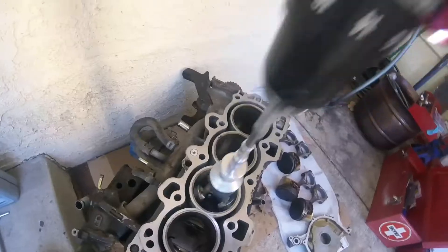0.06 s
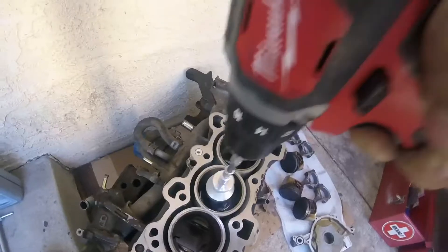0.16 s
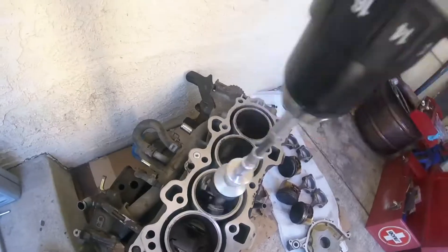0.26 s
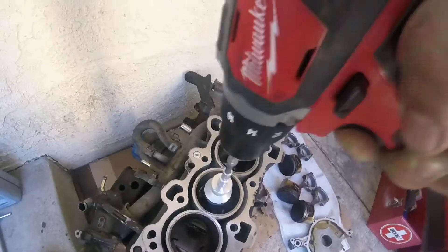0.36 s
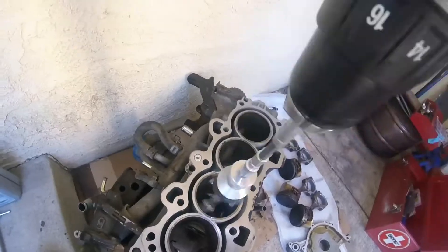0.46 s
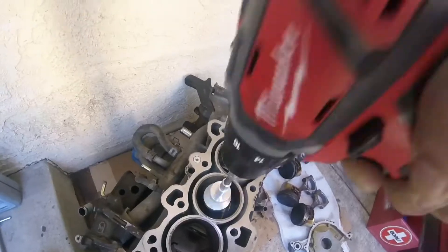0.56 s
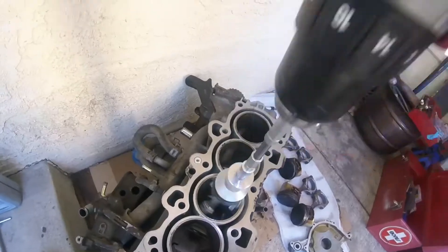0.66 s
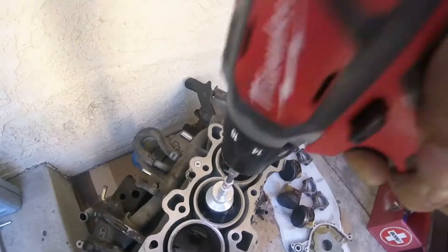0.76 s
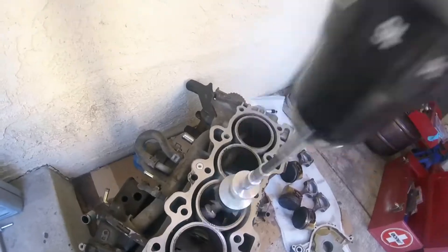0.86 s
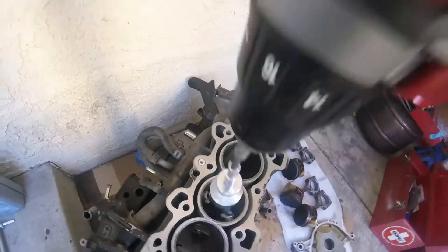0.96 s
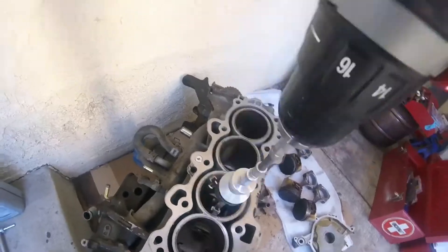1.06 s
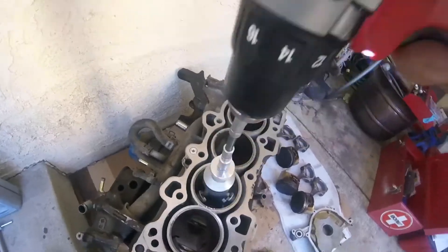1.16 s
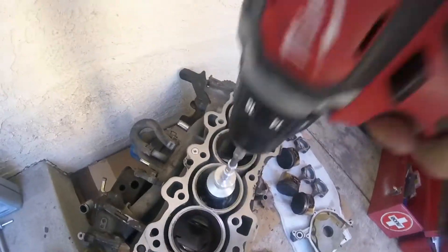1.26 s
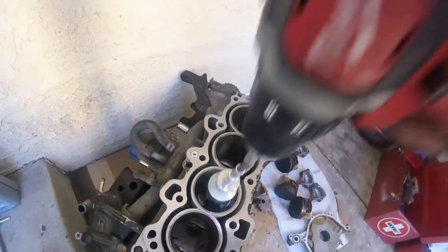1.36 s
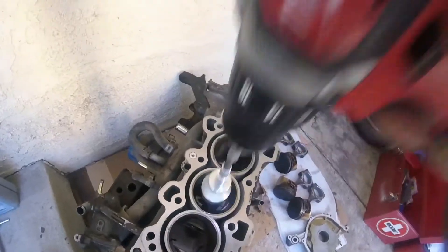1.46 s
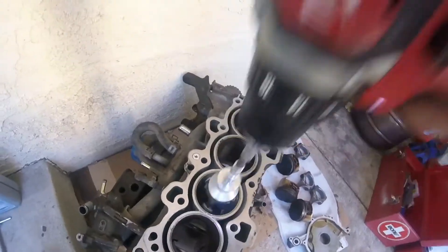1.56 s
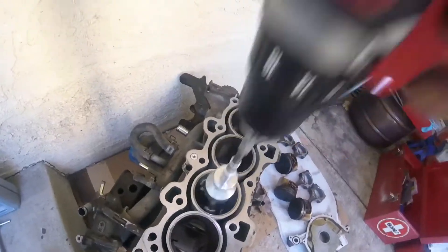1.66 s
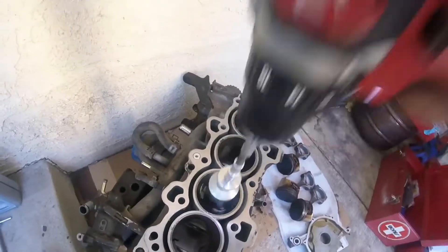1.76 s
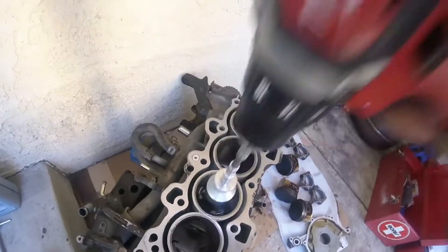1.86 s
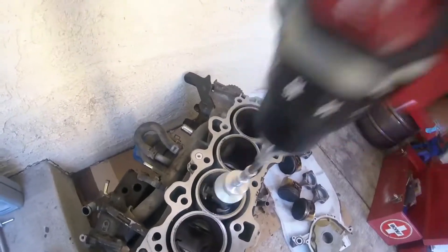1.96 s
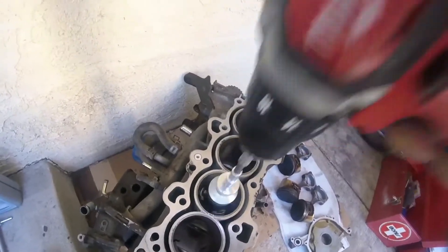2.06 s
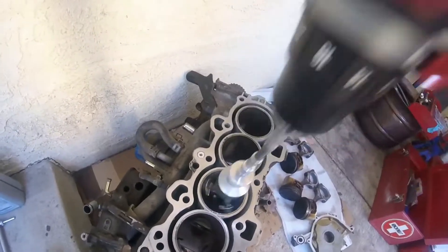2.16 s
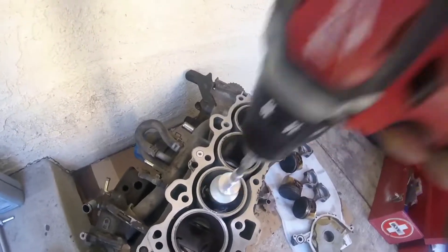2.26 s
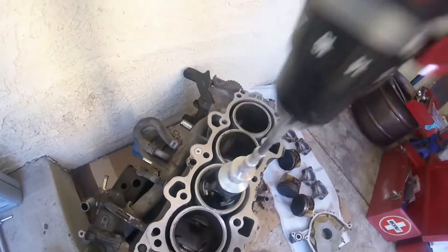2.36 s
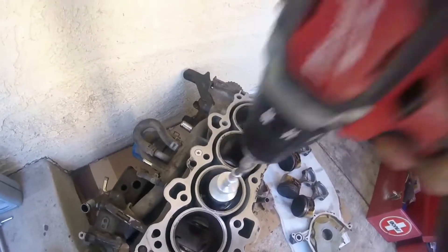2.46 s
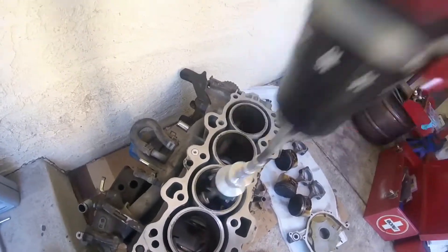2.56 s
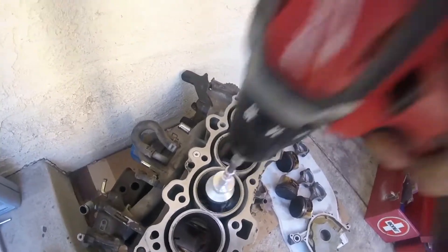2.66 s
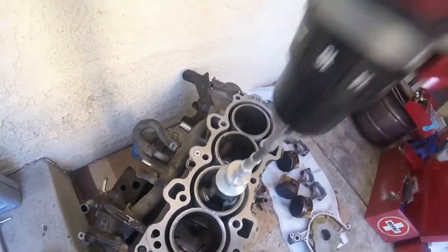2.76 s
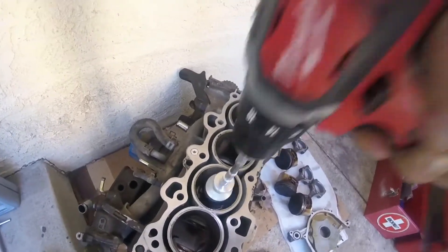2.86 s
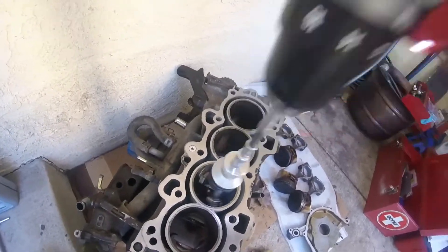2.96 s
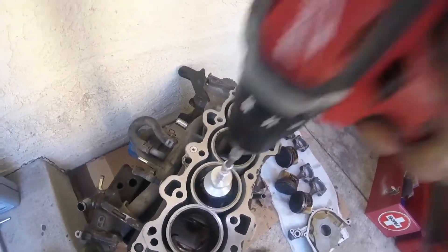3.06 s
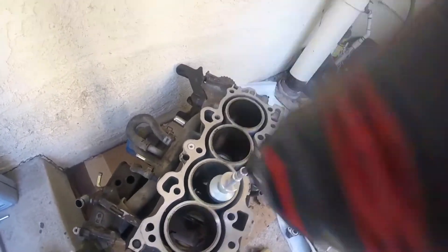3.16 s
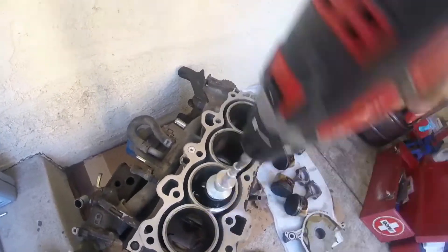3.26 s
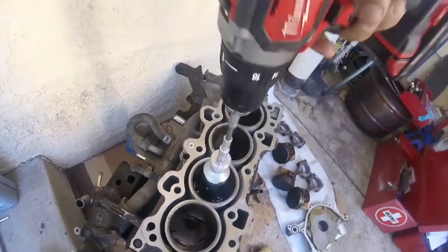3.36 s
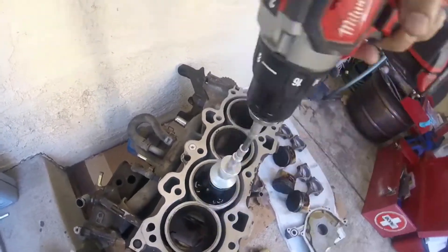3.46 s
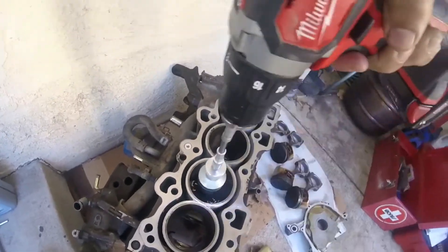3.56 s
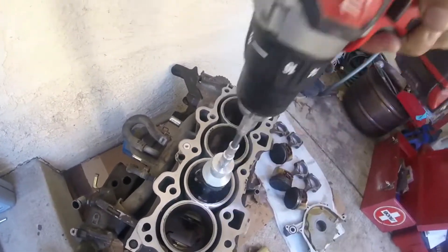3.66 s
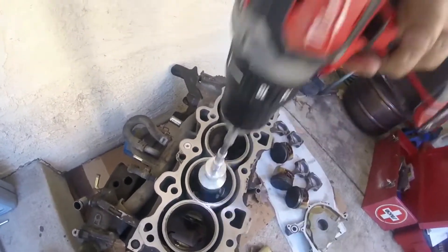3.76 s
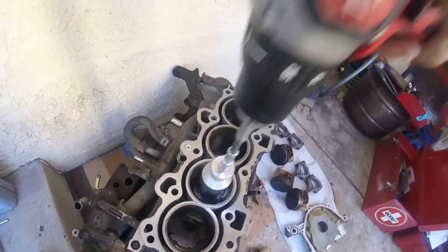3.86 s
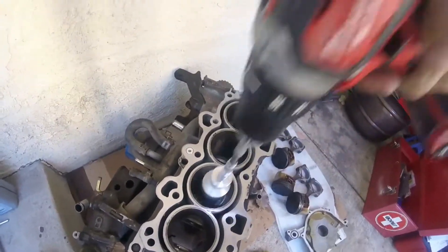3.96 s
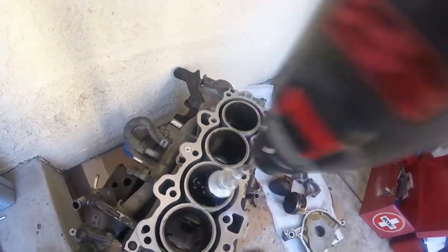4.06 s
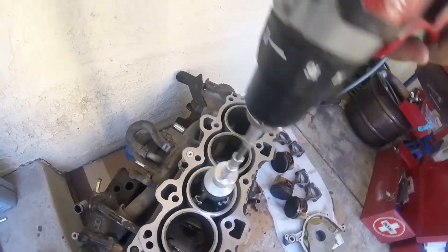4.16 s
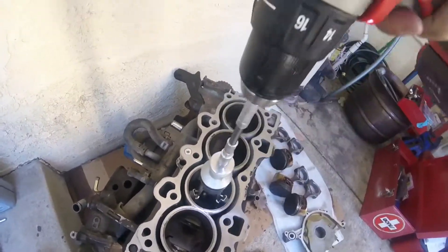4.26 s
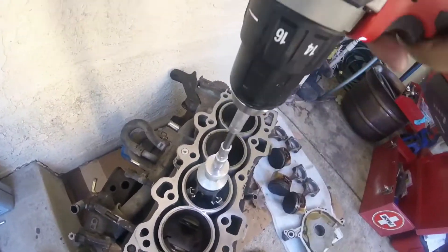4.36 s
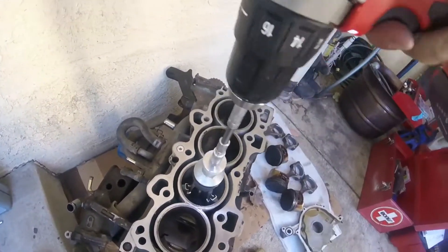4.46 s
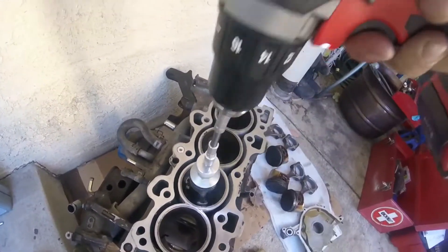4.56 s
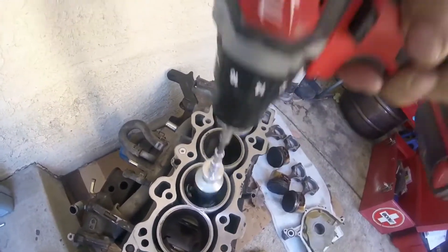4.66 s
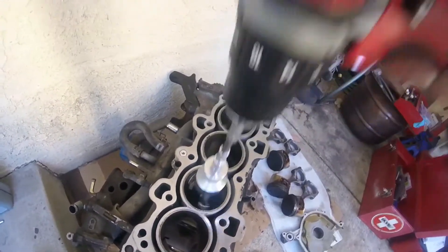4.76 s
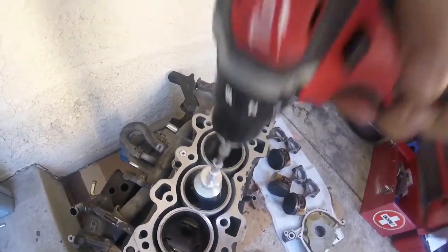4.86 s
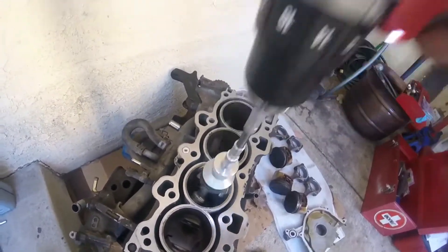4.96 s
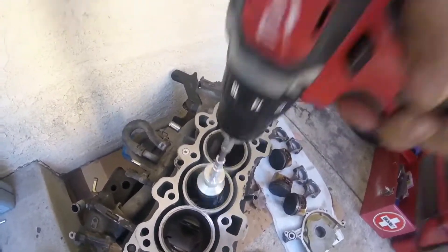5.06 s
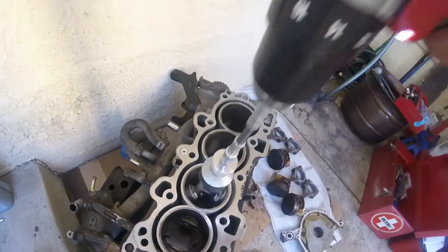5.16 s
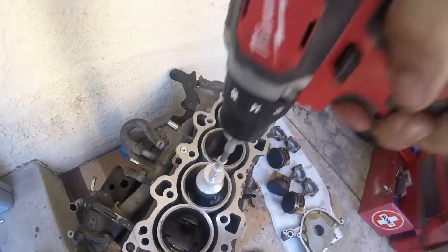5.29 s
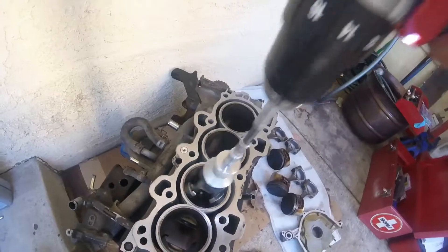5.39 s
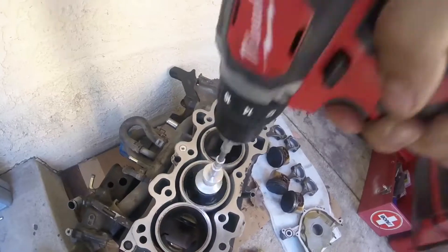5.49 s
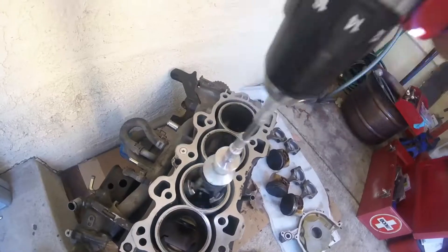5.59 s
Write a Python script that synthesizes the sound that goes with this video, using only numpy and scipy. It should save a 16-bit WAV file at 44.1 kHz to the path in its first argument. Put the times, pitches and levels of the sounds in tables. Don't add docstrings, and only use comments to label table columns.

```python
import sys
import numpy as np
from scipy import signal
from scipy.fft import rfft, irfft
from scipy.io import wavfile
from scipy.ndimage import uniform_filter1d

SR = 44100
rng = np.random.default_rng(int(sys.argv[2]) if len(sys.argv) > 2 else 0)


def field_ratio(decibels):
    return 10 ** (np.asarray(decibels, dtype=float) / 20)


def inscribe(sig):
    pcm = np.round(np.clip(np.atleast_2d(sig).T, -1, 1) * 32767)
    wavfile.write(sys.argv[1], SR, pcm.astype(np.int16))


N = 248150
STEP = 32


def rms_one(x):
    return x / np.sqrt(np.mean(x ** 2) + 1e-20)


def in_time(rows):
    s, *columns = np.transpose(rows)
    return [np.interp(np.arange(N) / SR, s, c) for c in columns]


def steps():
    return np.arange(0, N + STEP, STEP) / SR


def per_sample(control):
    return np.interp(np.arange(N) / SR, steps(), control)


def power_sum(levels_db):
    return 10 * np.log10(sum(field_ratio(2 * db) for db in levels_db) + 1e-12)


def swell(s, db, rise, fall, order):
    t = steps() - s
    return np.maximum(db - 6 * np.abs(t / np.where(t < 0, rise, fall)) ** order, -150)


def band(x, low_hz, high_hz):
    return signal.sosfilt(signal.butter(3, [low_hz, high_hz], "band", fs=SR, output="sos"), x)


def coloured(x, spectrum):
    hz, db = np.transpose(spectrum)
    at = np.maximum(np.fft.rfftfreq(N, 1 / SR), 1)
    gain = field_ratio(np.interp(np.log(at), np.log(hz), db))
    return rms_one(irfft(rfft(x) * gain, N))


def drift(rate):
    r = np.exp(-32 * np.pi * rate / SR)
    slow = signal.lfilter([1], [1, -2 * r, r * r], rng.standard_normal(N // 16 + 3002))[3000:]
    return np.interp(np.arange(N) / 16, np.arange(len(slow)), rms_one(slow))


def resonances(x, peaks, patchy_db=0):
    out = 0
    for k, (hz, width, db) in enumerate(peaks):
        r = np.exp(-np.pi * width / SR)
        a = [1, -2 * r * np.cos(2 * np.pi * hz / SR), r * r]
        b = [(1 - r * r) / 2, 0, (r * r - 1) / 2]
        gain = field_ratio(db + patchy_db * drift(10.6)) if patchy_db else field_ratio(db)
        out = out + (-1) ** k * gain * signal.lfilter(b, a, x)
    return out


def groan(rows):
    hz, db = in_time(rows)
    t = np.arange(N) / SR
    sounding = (t > rows[0][0]) * (t < rows[-1][0])
    return field_ratio(db + 4.5 + 3.9 * drift(12)) * np.sin(2 * np.pi * np.cumsum(hz) / SR) * sounding


def workshop():
    # time_s, hum_db, upper_db, half_length_s
    shakes = [(0.95, -38, -41, 0.027), (1.25, -36.5, -58, 0.046), (1.38, -37, -38, 0.008),
              (2.968, -37, -44, 0.015), (3.093, -54, -59, 0.04), (3.17, -37, -43, 0.041),
              (2.447, -43, -59, 0.044), (1.802, -40, -53, 0.074), (2.08, -47, -52, 0.061),
              (2.863, -42, -67, 0.03), (3.428, -42, -51, 0.034), (3.833, -39.5, -47.5, 0.11),
              (3.988, -62, -51, 0.073), (4.068, -51, -60, 0.015)]
    # pitch_hz, width_hz, level_db
    rumble_peaks = [(51.2, 8.8, -3), (148.7, 38.8, 2.5), (198.2, 41.7, -1), (292, 32, -4.5),
                    (490, 5.3, -21)]
    # pitch_hz, density_db
    floor = [(290, -17), (500, -16), (629, 0), (1800, -3.5), (3340, -13), (9290, -33), (11500, -31),
             (12500, -32), (16200, -66), (22000, -120)]
    floor_db, deep_db = -53.5, -46
    hum_db = per_sample(power_sum([-41] + [swell(s, db, half, half, order=2) for s, db, _, half in shakes]))
    upper_db = per_sample(power_sum([-47.5] + [swell(s, db, half, half, order=2) for s, _, db, half in shakes]))
    white = rng.standard_normal(N)
    humps = 0.18 * white + resonances(white, rumble_peaks, patchy_db=1.0)
    deep = field_ratio(deep_db + 0.14 * drift(1.8)) * rms_one(band(humps, 20.0, 90.6))
    hum = field_ratio(hum_db + 0.98 * drift(30)) * rms_one(band(humps, 98.0, 249))
    upper = field_ratio(upper_db + 1.5 * drift(9.1)) * rms_one(band(humps, 238.6, 600))
    hiss = field_ratio(floor_db + 1.2 * drift(10.6)) * coloured(rng.standard_normal(N), floor)
    return deep + hum + upper + hiss


def drone():
    # time_s, pitch_hz, level_db
    low_line = [(4.46, 164.6, -64), (4.6, 175.5, -53), (4.72, 188.5, -55), (4.81, 202.3, -43),
                (4.9, 200, -52), (5.15, 195.5, -59), (5.26, 200.2, -50), (5.36, 205.7, -58),
                (5.48, 197.3, -46.5), (5.62, 202.3, -54)]
    # time_s, pitch_hz, level_db
    high_line = [(4.5, 275, -66), (4.68, 277, -57), (4.85, 269.2, -65), (4.99, 272, -52), (5.1, 272, -50),
                 (5.17, 274.6, -64), (5.25, 280, -53), (5.33, 280, -66)]
    return groan(low_line) + groan(high_line)


def splits():
    # time_s, low_hz, high_hz, level_db
    patches = [
        (.70, 9650, 11220, -41),
        (0.859, 8270, 9900, -38),
        (1.46, 4170, 5200, -43),
        (2.045, 6540, 7900, -35),
        (5.199, 4620, 5680, -40),
        (5.315, 7760, 9100, -44),
    ]
    t, white = np.arange(N) / SR, rng.standard_normal(N)
    out = np.zeros(N)
    for s, low_hz, high_hz, db in patches:
        shape = np.cos(np.clip((t - s) / 0.02, -1, 1) * np.pi / 2)
        noise = rms_one(band(band(white, low_hz, high_hz), low_hz, high_hz))
        out += field_ratio(db) * shape * noise
    return out * [[1], [-1]]


def ticks():
    # time_s, peak_db
    tick_times = [
        (3.325, -22),
        (3.537, -34.5),
        (4.33, -25.5),
        (4.428, -38),
        (4.489, -42),
    ]
    # pitch_hz, width_hz, level_db
    tick_modes = [(1120, 150, 6.5), (1510, 350, -8), (2750, 250, 3.5), (3350, 500, -1), (4370, 600, -8),
                  (5400, 500, -6)]
    clicks = np.zeros(N) + 1e-18
    for s, db in tick_times:
        clicks[round(s * SR)] = field_ratio(db + 22.0)
    return resonances(clicks, tick_modes) + .05 * band(clicks, 900, 6000)


def clacks():
    # time_s, peak_db, low_part_db, t60_s, rise_s
    hits = [(0.9446, -21, -7.5, 0.1, 0.001), (0.9686, -12, -27, 0.04, 0.0008),
            (0.975, -10, -30, 0.04, 0.0011), (0.983, -3, -36, 0.025, 0.00084),
            (0.9868, -14, -35, 0.027, 0.0011), (0.873, -19, -18, 0.041, 0.0011),
            (1.3775, -18.5, -10, 0.032, .002), (1.382, -4, -35, 0.025, 0.0018),
            (1.392, -15.5, -11, 0.032, 0.0011), (2.95, -11.5, -19, 0.036, 0.0023),
            (3.1348, -9, -19.5, 0.056, 0.0012), (3.149, -17, -17, 0.022, 0.00099),
            (3.1795, -14, -17, 0.14, 0.001), (3.272, -20, -24, 0.064, 0.00077),
            (3.395, -28, -32, .06, .004), (3.4054, -2, -39, 0.026, 0.00027),
            (3.417, -16, -36, 0.052, 0.001), (3.6626, -55, -22, 0.04, 0.001),
            (4.0562, -8, -28, 0.028, 0.0022), (4.064, -14.5, -11, 0.03, 0.0008),
            (4.0673, -11, -25, 0.045, 0.001), (4.101, -26, -10, .03, .002),
            (4.1065, -5.5, -26, 0.03, 0.0035), (4.1165, -19.5, -10, 0.025, 0.0011)]
    # pitch_hz, width_hz, level_db
    chuck_modes = [(1110, 150, -37), (2720, 1400, -6.5), (5200, 570, -9.5), (6580, 460, 0.5),
                   (9100, 1020, -4), (12200, 1600, -0.5)]
    high, low, t = np.zeros(N), np.zeros(N), np.arange(SR // 4) / SR
    for s, db, low_db, t60, rise in hits:
        attack = np.minimum(t / max(rise, 1e-4), 1)
        shape = attack * field_ratio(-60 * np.maximum(t - rise, 0) / max(t60, .005))
        at = round(s * SR)
        high[at:at + len(t)] += field_ratio(db - 8.0) * shape
        low[at:at + len(t)] += field_ratio(db + low_db + 3.0) * shape ** 0.68
    rattle = rng.standard_normal(N) * field_ratio(1.5 * drift(270))
    metal = rms_one(0.25 * rattle + resonances(rattle, chuck_modes))
    return band(high * metal, 3100, 22000) + band(2.62 * low * metal, 91, 2640)


def chatter():
    # time_s, peak_db
    contacts = [(3.213, -27), (3.226, -29), (3.2543, -40), (3.265, -35), (3.2704, -27), (3.2746, -28),
                (3.2809, -28), (3.2851, -29), (3.286, -28), (3.2913, -29), (3.2954, -26), (3.2997, -29),
                (3.307, -35), (3.3117, -33), (3.315, -31), (3.318, -30)]
    # pitch_hz, width_hz, level_db
    hone_modes = [(4300, 700, -4), (5300, 500, 0), (7550, 1200, -7), (9300, 1200, -6), (11300, 1700, 8)]
    puffs, t = np.zeros(N), np.arange(200) / SR
    for s, db in contacts:
        at = round(s * SR) - 10
        puffs[at:at + 200] += field_ratio(db + 6.0 - 60 * t / 0.0067)
    return resonances(puffs * rng.standard_normal(N) + 1e-18, hone_modes)


def shaft():
    # time_s, level_db
    rings = [
        (.983, -35),
        (1.383, -34),
        (3.4055, -34),
        (4.109, -27.5),
    ]
    # pitch_hz, level_db, t60_s
    steel_modes = [(5060, -5.5, 0.2), (5100, -5, 0.11), (6340, -4.5, 0.25), (8100, -15, 0.032),
                   (9100, -3, 0.083), (10900, -6, .1)]
    t, out = np.arange(SR // 4) / SR, np.zeros(N)
    for hz, db, t60 in steel_modes:
        flutter = field_ratio(3.3 * drift(60))
        for s, hit_db in rings:
            at = round(s * SR)
            decay = field_ratio(hit_db + db - 60 * t / t60)
            out[at:at + len(t)] += flutter[at:at + len(t)] * decay * np.sin(2 * np.pi * hz * t)
    return out


def grabs():
    # time_s, low_modes_db, middle_modes_db, high_modes_db
    bursts = [(.05, -32, -34.5, -48), (.095, -34, -39, -36), (.275, -36, -42, -42), (.31, -47, -37, -43),
              (.47, -32, -41, -44), (.5, -33, -35, -37), (.545, -33, -37, -28), (.694, -37, -42, -36),
              (.752, -39, -45, -45), (.899, -31, -40, -42), (.95, -26, -37, -44), (1.017, -36, -48, -45),
              (1.145, -38, -46, -51), (1.242, -36, -46, -44), (1.48, -43, -46, -45), (1.66, -42, -39, -36),
              (1.707, -35, -37, -39), (1.845, -40, -43, -38), (1.889, -36, -46, -42), (2.04, -34, -36, -40),
              (2.07, -38, -41, -36), (2.218, -43, -43, -40), (2.267, -36, -36, -34.5),
              (2.423, -35, -33, -37), (2.48, -45, -42, -36), (2.636, -33, -35, -34),
              (2.681, -30.5, -43, -44), (2.827, -39, -35, -37), (2.869, -46, -42, -40),
              (3.019, -29, -33, -35), (3.062, -30, -32.5, -33), (3.445, -52, -54, -52),
              (3.56, -62, -54, -53), (3.59, -58, -56, -55), (3.775, -36, -50, -49), (3.93, -43, -40, -46),
              (3.97, -45, -34.5, -44), (4.345, -59, -53, -62), (4.38, -65, -57, -62), (4.41, -60, -53, -62),
              (4.245, -50, -52, -56), (4.767, -42, -40, -54), (4.852, -39, -51, -39),
              (4.911, -48, -46, -47), (5.03, -31.5, -36, -44), (5.056, -33, -45, -42),
              (5.208, -35, -35, -46), (5.233, -32.5, -37, -41), (5.28, -40, -44, -49),
              (5.42, -31, -34, -39), (5.46, -33, -36, -44), (5.62, -32, -33, -39)]
    # pitch_hz, width_hz, level_db
    bore = [
        [(4060, 170, 1.5), (4310, 100, 1.5), (4430, 120, -2), (4960, 160, -5), (5200, 56, -7)],
        [(6080, 140, -3.5), (6440, 150, 4.5), (7060, 170, 1.5)],
        [(8320, 67, 13.5), (8560, 90, 16), (9240, 140, -14)],
    ]
    rise_s, fall_s = 0.017, 0.018
    out = 0
    for k, modes in enumerate(bore):
        level_db = per_sample(power_sum(swell(row[0], row[k + 1], rise_s, fall_s, order=2) for row in bursts))
        out = out + field_ratio(level_db) * rms_one(resonances(rng.standard_normal(N), modes, patchy_db=3.5))
    return out


def contact():
    # start_s, end_s, level_db, rise_db_per_s, fall_db_per_s
    drives = [
        (-.1, 1.018, -38, 500, 400),
        (1.204, 3.197, -38.5, 900, 650),
        (3.896, 4.071, -38.5, 18, 900),
        (4.12, 4.146, -37, 900, 188),
        (4.621, 5.699, -38.5, 305, 500),
    ]
    # time_s, level_db, half_length_s
    bites = [(0.097, -39, 0.07), (0.288, -37, 0.057), (0.513, -35, 0.052), (0.74, -37, 0.051),
             (0.961, -35, 0.097), (1.22, -42, 0.068), (1.467, -38, 0.044), (1.678, -38.5, 0.049),
             (1.862, -35.5, 0.049), (2.047, -35.5, 0.045), (2.25, -35.5, 0.058), (2.446, -34.5, 0.044),
             (2.65, -33.5, 0.053), (2.832, -34.5, 0.059), (3.032, -35.5, 0.053), (3.17, -44, 0.062),
             (3.955, -35.5, 0.038), (4.675, -37.5, 0.043), (4.843, -36.5, 0.052), (5.043, -35, 0.052),
             (5.232, -36.5, 0.052), (5.444, -35.5, 0.044), (5.626, -34.5, 0.027)]
    # time_s, level_db, rise_s, fall_s, extra_brightness_db
    coasts = [
        (1.03, -39.5, 0.023, 0.053, -13),
        (1.146, -45, 0.034, 0.014, 0),
        (3.29, -41, 0.015, 0.037, 3),
        (3.429, -50, 0.044, 0.055, 3),
        (3.57, -55, 0.059, 0.03, 3),
        (4.2, -41, 0.1, 0.034, 2.5),
        (4.38, -55.5, 0.058, 0.066, -0.5),
        (4.541, -61, 0.053, 0.039, 2),
    ]
    # drive_db, bite_db, coast_db
    dull_share = (0, -10, -5.5)
    # drive_db, bite_db, coast_db
    middle_share = (-0.67, -27, -8)
    # drive_db, bite_db, coast_db
    stones_share = (-0.68, 1.7, 0.98)
    # drive_db, bite_db, coast_db
    bright_share = (5.33, 1.3, 2.18)
    slow_start_s, slow_start_db_per_s = 3.68, 470
    lag_db_per_s = 27
    best_hz, span_hz, lift_db = 1390, 80, 2

    t = steps()
    held = [db - rise * np.maximum(start - t, 0) - fall * np.maximum(t - end, 0)
            for start, end, db, rise, fall in drives]
    held[2] -= slow_start_db_per_s * np.maximum(slow_start_s - t, 0)
    held = np.max(held, axis=0)
    bite = power_sum(swell(s, db, half, half, order=4) for s, db, half in bites)
    coast = power_sum(swell(s, db, rise, fall, order=2) for s, db, rise, fall, _ in coasts)
    bright_coast = power_sum(swell(s, db + extra, rise, fall, order=2) for s, db, rise, fall, extra in coasts)
    lag = lag_db_per_s * np.maximum(drives[2][0] - t, 0) * (t > slow_start_s - .1)

    def mixed(drive_db, coast_db, share):
        return power_sum(np.add([drive_db, bite, coast_db], np.c_[list(share)]))

    dull = mixed(held - lag, coast, dull_share)
    middle = mixed(held - 1.1 * lag, coast, middle_share)
    middle = middle + lift_db * np.exp(-((speed()[0] - best_hz) / span_hz) ** 2)
    stones = mixed(held - .4 * lag, coast, stones_share)
    bright = mixed(held, bright_coast, bright_share)
    return map(per_sample, (dull, middle, stones, bright))


def rasp():
    # pitch_hz, density_db
    rasp_colour = [(290, -40), (500, -2), (880, -12.5), (1120, -7), (1280, -10), (1900, -3.5), (2420, -5.5),
                   (2800, 1), (9550, -2), (12000, 3.5), (12500, -2.5), (16200, -63), (22000, -120)]
    # pitch_hz, width_hz, level_db
    block = [(2054, 290, 1), (2690, 230, 2), (3270, 140, -5), (4110, 42, 2), (4320, 24, 6.5),
             (4570, 140, -15), (4850, 130, 1.5), (5235, 59, 7), (6410, 70, 1.5), (6940, 136, 4),
             (8370, 60, 2), (8530, 85, 3), (9330, 410, 4), (10100, 260, 1)]
    dull_db, middle_db, load_db, bright_db = contact()
    sizes = field_ratio(2.1 * np.minimum(rng.exponential(1, N), 5)) * rng.choice([-1, 1], N)
    struck = rng.random(N) < 9000 / SR
    grit = rms_one(sizes * struck) + 0.51 * rng.standard_normal(N)
    hiss = coloured(grit, rasp_colour)
    pressure = field_ratio(0.15 * np.clip(load_db - uniform_filter1d(load_db, SR // 4), -8, 8))
    ringing = field_ratio(-1.5) * pressure * resonances(np.roll(hiss, N // 3), block, patchy_db=2.5)
    body = hiss + ringing
    other = hiss[::-1] + ringing
    dull = field_ratio(dull_db - 3.0 + 1.4 * drift(62)) * rms_one(band(body, 744, 2150))
    middle = field_ratio(middle_db - 2.5 + 1.25 * drift(22)) * rms_one(band(other, 2560, 3570))
    stones = field_ratio(load_db + 1.5 * drift(34)) * rms_one(band(band(body, 3390, 5850), 3860, 12400))
    bright = field_ratio(bright_db + 0.54 + 0.77 * drift(23)) * rms_one(band(other, 6560, 16000))
    return field_ratio(0.19 * drift(62)) * (dull + middle + stones + bright)


def speed():
    # time_s, pitch_hz, first_line_db, third_line_db (over their means)
    sags = [(-0.014, 1288, -2, 3), (0.162, 1061, 1.5, 0.5), (0.387, 1056, 1.5, 4.5), (0.596, 1023, 1.5, 5),
            (0.789, 1003, -0.5, 0.5), (1.2, 1198, 1.5, 10), (1.397, 1164, -1, -6), (1.54, 912.5, -3, -0.5),
            (1.74, 892, -3, 3), (1.931, 986, -1, 2), (2.13, 969, -1, 1.5), (2.329, 934, -2.5, 2.5),
            (2.52, 894, -4, 1.5), (2.717, 1027, 0.5, 5.5), (2.928, 1128, 0.5, 3), (3.118, 1051, 1, 2.5),
            (4.6, 1259, 5.5, 9), (4.95, 1180, 3, 2), (5.13, 1086, 2.5, 1.5), (5.361, 1208, 1.5, 1.5),
            (5.49, 1110, 3, 4)]
    # time_s, pitch_hz, first_line_db, third_line_db (over their means)
    peaks_of_speed = [(0.038, 1458, -2, 5), (0.259, 1383, -5.5, 3), (0.478, 1385, -4.5, 0),
                      (0.691, 1221, -4.5, 0.5), (0.884, 1256, -1.5, 6), (1.299, 1207, 0, 4.5),
                      (1.419, 1275, -1, 2.5), (1.652, 1081, -2, -3), (1.835, 1207, -1, 3.5),
                      (2.018, 1254, -1, 5), (2.211, 1309, -4, 3), (2.409, 1183, -1, 2),
                      (2.619, 1215, -0.5, 3), (2.812, 1390, -2.5, 0), (2.988, 1405, -3, 3),
                      (3.17, 1433, -1, 11), (4.735, 1249, 0.5, 3.5), (5.002, 1198, 2, 5),
                      (5.199, 1295, -2, 4.5), (5.392, 1213, 1, 5), (5.71, 1220, 0, -2)]
    s, *columns = np.hstack([sags, peaks_of_speed]).reshape(2 * len(sags), -1).T
    turn = np.arange(len(s))
    k = np.interp(steps(), s, turn)
    eased = np.floor(k) + .5 - .5 * np.cos(np.pi * (k % 1))
    return [np.interp(eased, turn, c) for c in columns]


def whine_pitch():
    spin_ups = (1.221, 4.644)
    short, spin_s = .27, .027
    since = [np.arange(N) / SR - s for s in spin_ups]
    missing = sum(np.exp(-np.maximum(t, -.02) / spin_s) * (t > -.1) for t in since)
    return per_sample(speed()[0]) * (1 - short * missing)


def strands():
    # time_s, multiple_of_pitch, level_db, half_length_s
    swells = [(1.49, 4, -43, 0.028), (1.61, 4, -46, .025), (1.655, 4, -47, 0.029), (1.5, 4, -40, .025),
              (4.67, 4, -43, .035), (1.235, 4, -39, .022), (.91, 3, -38, .028), (5.2, 24 / 9, -48, .03),
              (1.3, 3, -41, .015), (4.68, 24 / 9, -50, .035), (4.99, 24 / 9, -51, 0.056),
              (5.24, 2, -44.5, .06), (.04, 8 / 9, -47, 0.032), (0.81, 2, -46, .025),
              (0.61, 2, -42.5, 0.031), (2.5, 2, -42, .04), (3.11, 2, -47, .04)]
    phase = 2 * np.pi * np.cumsum(whine_pitch()) / SR + .15 * drift(120)
    lines = 0
    for n in {round(9 * row[1]) for row in swells}:
        level_db = power_sum(swell(s, db, half, half, order=2) for s, k, db, half in swells if round(9 * k) == n)
        lines = lines + field_ratio(per_sample(level_db)) * np.sin(n / 9 * phase)
    return np.sqrt(2) * field_ratio(3.0 * drift(70)) * lines


def flares(pitch):
    # time_s, level_db, half_length_s
    moments = [(.03, -37, 0.044), (0.245, -41, 0.038), (0.46, -35.5, 0.025), (.7, -48, 0.031),
               (1.23, -39.5, 0.018), (2.21, -41, 0.03), (2.809, -34.5, .03), (3.0, -37, .03),
               (5.23, -44, 0.056), (0.173, -40, 0.023), (1.545, -45, 0.061), (1.742, -47, .03),
               (1.93, -46, 0.033), (2.133, -45, 0.033), (2.33, -41.5, 0.044), (2.524, -48, 0.022)]
    level_db = per_sample(power_sum(swell(s, db, half, half, order=2) for s, db, half in moments))
    phase = 4 * np.pi * np.cumsum(pitch) / SR + .7 * drift(120)
    line = field_ratio(level_db + 4 + 2.5 * drift(60)) * np.sin(phase)
    return resonances(line, [(1850, 300, 0), (2720, 280, 0)])


def whine(hz, lower_db, upper_db, spans, lower, upper, others, inertia_s, wobble, rough_db, play):
    # pitch_hz, width_hz, level_db
    casing = [(1900, 300, -3), (2730, 200, 6), (4300, 700, -3), (9800, 2500, -4)]
    hz = uniform_filter1d(hz, max(int(inertia_s * SR), 1)) * (1 + wobble * drift(40.0))
    phase = 2 * np.pi * np.cumsum(hz) / SR
    play = play * drift(150)
    t = np.arange(N) / SR
    on = sum(np.interp(t, [a - .01, a + .01, b - .01, b + .01], [0, 1, 1, 0]) for a, b in spans)
    out = field_ratio(lower_db + 0.37 * rough_db * drift(74)) * np.sin(lower * phase + (lower - 1) * 3 * play)
    out += field_ratio(upper_db - 1.5 + rough_db * drift(113)) * np.sin(upper * (phase + play))
    level_db = uniform_filter1d(upper_db, SR // 10)
    weak = sum(field_ratio(level_db + db + rough_db * drift(19)) * np.sin(k * (phase + play)) for k, db in others)
    return np.sqrt(2) * on * (out + 0.26 * weak + resonances(weak, casing))


def motor():
    # start_s, end_s
    sings = [
        (-.01, .885),
        (1.228, 1.375),
        (1.42, 3.138),
        (4.647, 5.7),
    ]
    # multiple_of_pitch, level_db (under the third line)
    weak_lines = [(2, -19), (4, -8.5), (16 / 9, -15), (24 / 9, -20), (8, -17), (80 / 9, -16)]
    # time_s, pitch_hz, second_line_db, fourth_line_db
    strain_track = [(3.76, 720, -53, -54), (3.85, 800, -47, -52), (3.876, 670, -54, -42),
                    (3.915, 845, -41, -37), (3.972, 850, -39, -37), (4.0, 790, -47, -42),
                    (4.03, 745, -49, -41), (4.065, 700, -52, -35)]
    # time_s, pitch_hz, level_db
    groan_track = [(3.6, 485, -49), (3.614, 507.7, -64), (3.828, 500.6, -57), (3.872, 528, -64),
                   (3.954, 503, -46), (4.046, 504, -52), (4.065, 493, -43), (4.14, 520, -71)]
    # time_s, pitch_hz, level_db
    moan_track = [(3.77, 727, -62), (3.8, 767, -52), (3.855, 815, -55), (3.868, 810, -62)]
    pitch = whine_pitch()
    full_speed, first_db, third_db = map(per_sample, speed())
    pull_db = 3.0 * np.tanh(np.gradient(pitch) * SR / 3500)
    fade_db = -14 * (1 - pitch / full_speed)
    runs = whine(pitch, -42 + 1.35 * first_db + pull_db + fade_db, -41.5 + third_db + fade_db, sings,
                 1, 3, weak_lines, inertia_s=.005, wobble=.003, rough_db=3.5, play=.18)
    strain_lines = [(1, -16), (1.5, -22), (2.5, -19), (3, -14), (3.5, -13), (4.3, -6), (6, -9), (8, -11)]
    strain = whine(*in_time(strain_track), [(strain_track[0][0], strain_track[-1][0])],
                   2, 4, strain_lines, inertia_s=.015, wobble=.007, rough_db=3.6, play=.14)
    return runs + strain + groan(groan_track) + groan(moan_track) + flares(pitch)


def scene():
    hits = clacks() + ticks() + chatter()
    steady = workshop() + drone() + .8 * hits + shaft() + grabs() + rasp() + strands() + motor()
    top = signal.cheby2(14, 45, 12400, fs=SR, output="sos")
    return signal.sosfilt(top, steady) + 0.12 * hits + splits()


def band_limit(x):
    return signal.sosfilt(signal.butter(12, 13160, fs=SR, output="sos"), x)


def record(dry):
    # time_s, level_db, recovery_s
    ducks = [
        (1.395, -4.5, 2.54),
        (4.122, -7.5, 1.12),
    ]
    overload = .6
    t = np.arange(N) / SR
    gain_db = sum(db * (t > s) * np.exp(-np.maximum(t - s, 0) / recovery) for s, db, recovery in ducks)
    ducked = dry * field_ratio(uniform_filter1d(gain_db, SR // 100))
    rounded = overload * np.tanh(ducked / overload)
    cut = signal.sosfilt(signal.cheby2(10, 50, 13000, fs=SR, output="sos"), rounded)
    return band_limit(cut)


dry = scene()
out = record(dry)
inscribe(out)
```